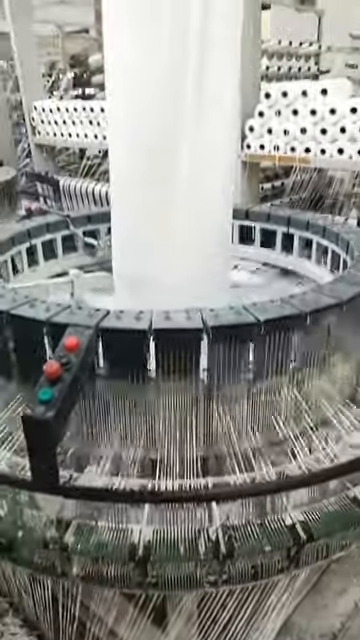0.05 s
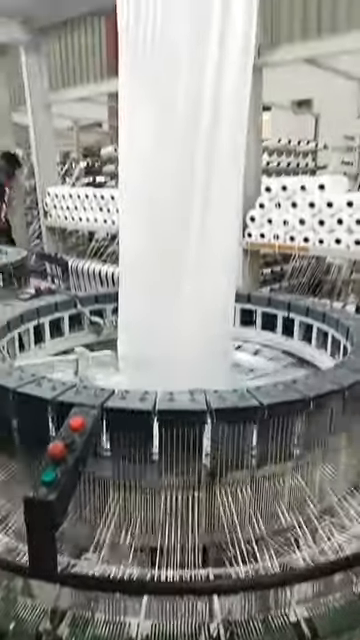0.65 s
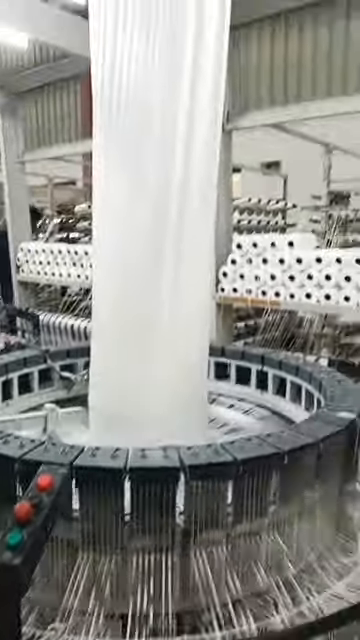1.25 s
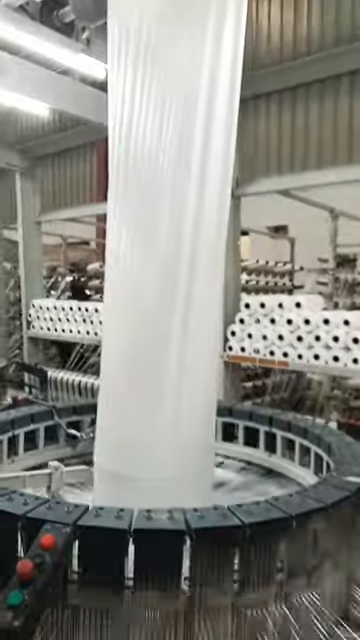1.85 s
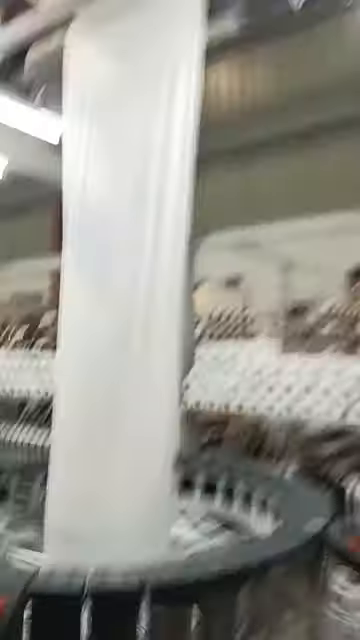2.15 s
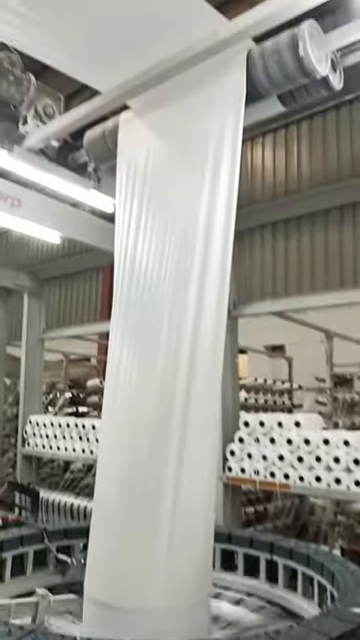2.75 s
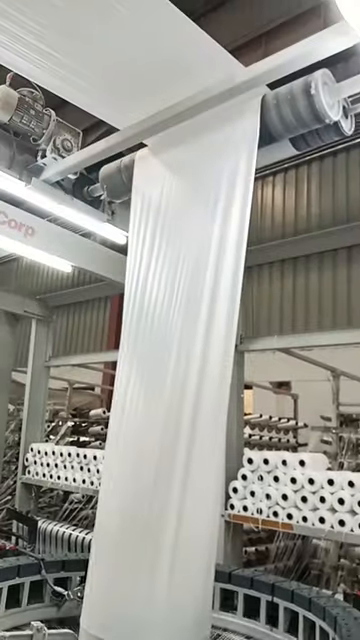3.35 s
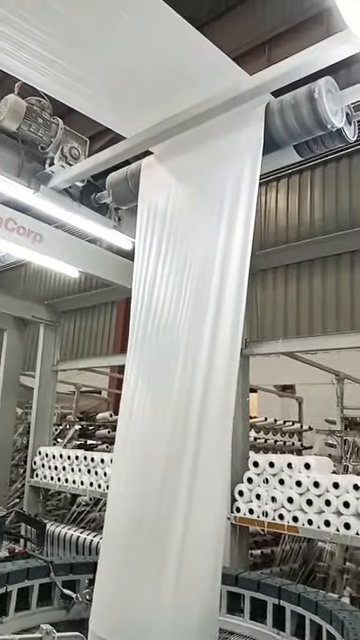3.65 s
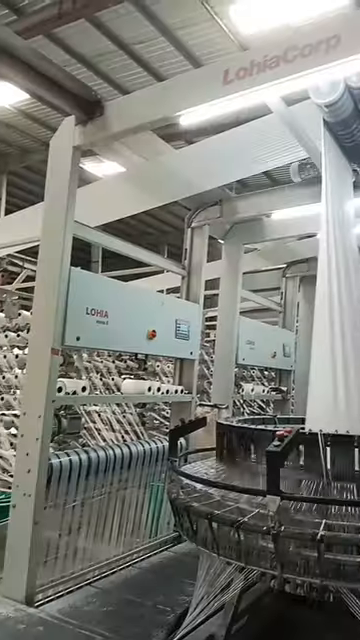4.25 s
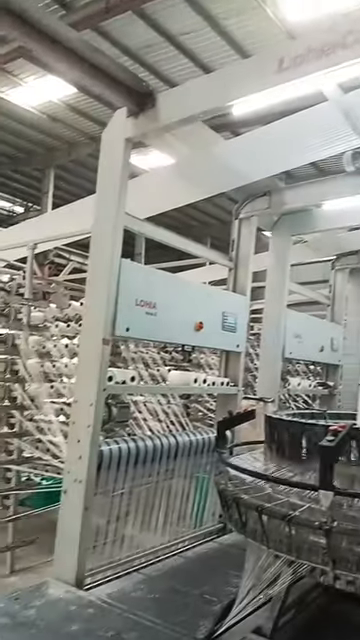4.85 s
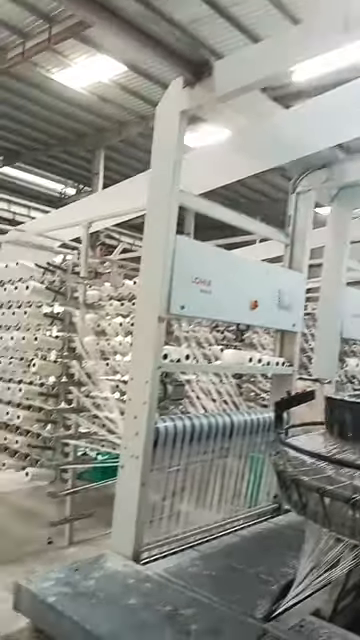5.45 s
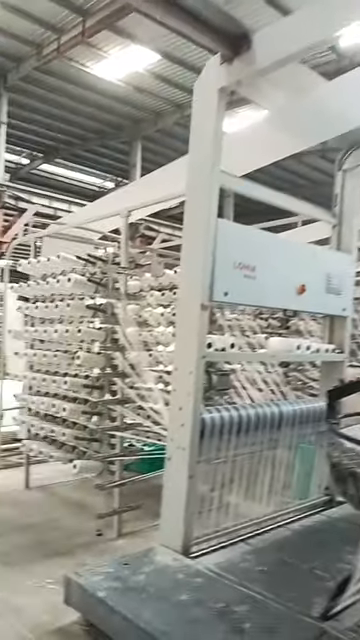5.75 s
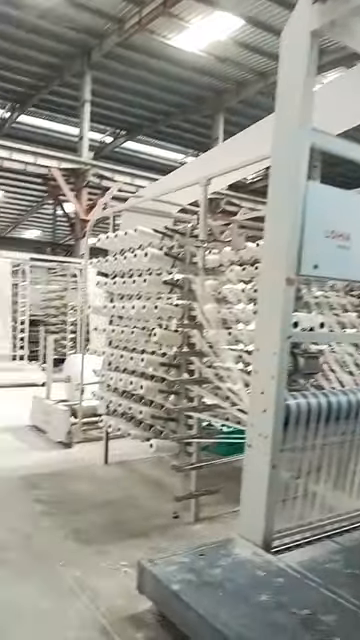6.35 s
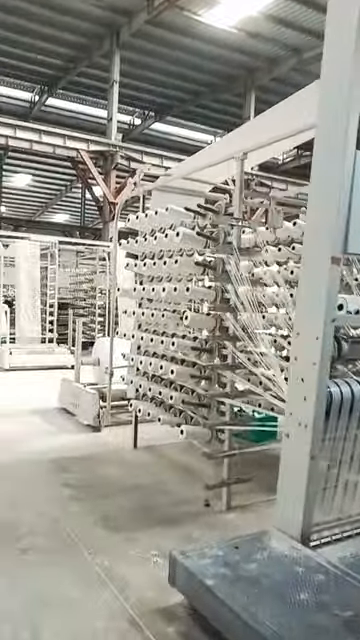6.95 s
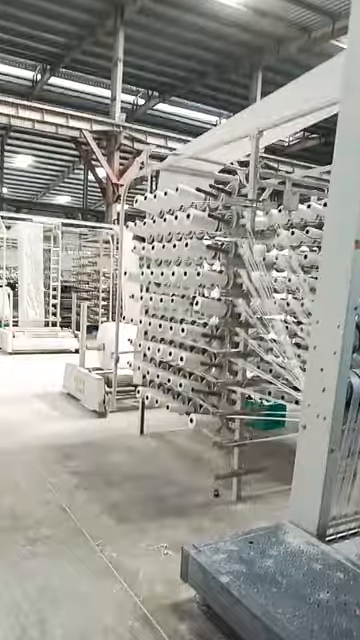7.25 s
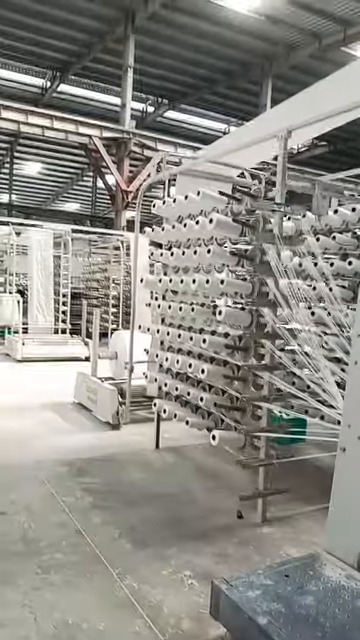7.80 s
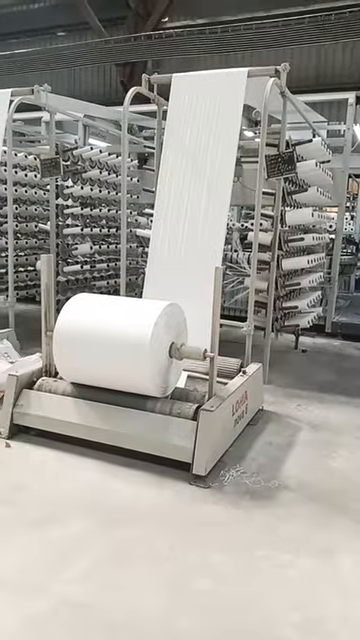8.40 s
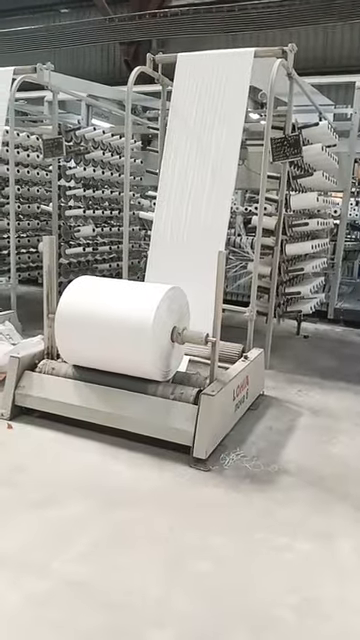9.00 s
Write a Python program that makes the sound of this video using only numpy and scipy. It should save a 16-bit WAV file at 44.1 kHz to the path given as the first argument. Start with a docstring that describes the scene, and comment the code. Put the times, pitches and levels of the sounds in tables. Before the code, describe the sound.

A dense, steady machine roar fills a reverberant weaving hall, blending metallic ringing, fast clatter, tape hiss and humming drives. It is heard from three positions in turn: first beside a loom, quieter and fluttering, with a few faint knocks; then from the aisle, clearly louder and smoother, with one tiny high squeak; and for the last second beside a winder, just as loud and pulsing again.

```python
"""Steel reed rings of circular looms resonate under the hammering of shuttle wheels in a weaving hall.
Heddles clatter, their wires ring, and plastic tapes hiss by friction in their guides, with brief scuffs,
a tick and one stick-slip squeak. A loom frame knocks now and then; drives hum and beat under the roar
of far looms. The hall is heard from three places in turn: at a loom, in the aisle, by a winder."""
import sys
import numpy as np
from scipy import signal
from scipy.fft import rfft, irfft, next_fast_len
from scipy.io import wavfile
from scipy.ndimage import uniform_filter1d

SR = 44100
rng = np.random.default_rng(int(sys.argv[2]) if len(sys.argv) > 2 else 0)


def file_out(sig):
    """Save sig as 16-bit WAV at sys.argv[1]."""
    # one column per channel
    cols = np.atleast_2d(sig).T
    # limit, then scale
    lim = np.clip(cols, -1, 1)
    pcm = np.round(lim * 32767).astype(np.int16)
    wavfile.write(sys.argv[1], SR, pcm)


N = 404397
TIME = np.arange(N) / SR
HZ = np.maximum(np.fft.rfftfreq(next_fast_len(N), 1 / SR), 1)

# friction spectrum of the tapes: (frequency [Hz], relative level at loom [dB], aisle [dB], winder [dB])
TAPE_SPECTRUM = [(1800, -16, -20, -21), (2900, 1, 4, 4), (3620, 0.5, 3.5, 3.5), (4060, 2, 3.5, -1.5),
                 (4500, -0.5, -0.5, 1), (5480, -0.5, 0.5, 0), (6030, -7.5, -5, -5.5), (6750, -0.5, 0.5, -1),
                 (7950, -1.5, -2, -4.5), (8740, -8, -8.5, -12.5), (9320, -19, -19.5, -26),
                 (10100, -15.5, -14.5, -22.5), (11660, -23.5, -26, -29), (13000, -18, -20, -25),
                 (13900, -30, -31, -40), (15400, -55, -25, -35)]
# modes of drives and frames:
# (frequency [Hz], width [Hz], relative level at loom [dB], aisle [dB], winder [dB])
FRAME_MODES = [(81.6, 14, -13, -17, -18), (108.4, 19, -8.5, -23, -13), (171.7, 40, 0, 2, 0),
               (207.4, 26, -2, 0, -1), (275.4, 21, -9, -6, -12), (319.4, 21, -5.5, -5, -6.5),
               (396, 29, -3, -1, -5), (454, 22, -1.5, -2, -11), (550, 110, -6.5, -15, -12),
               (627, 36, -12, -20, -4.5), (900, 27, -16, -9, -20)]


def reed_rings(place, blows, beat):
    """Modal resonance: wheel impacts keep the steel rings sounding, modulated by the shuttle beat."""
    # (frequency [Hz], width [Hz], relative level at loom [dB], aisle [dB], winder [dB])
    ring_modes = [(1073, 83, -15, -11.5, -10.5), (1101.2, 42, -7.5, -3.5, -2.5), (1199.3, 66, -5.5, -1, 0),
                  (1288, 51, -1, -2, 0.5), (1350, 43, -0.5, -1.5, -4), (1369, 40, -2, -2.5, -2),
                  (1463, 117, -11.5, -11, -8), (1544, 66, -11.5, -11.5, -5), (1322, 490, -13.5, -14, -15)]
    surge = from_db(0.72 * drift(per_s=8))  # the wheels bear unevenly on the rings
    ringing = steadied(coloured(blows, resonances(ring_modes, place)), span_s=0.076)
    return rms_one(ringing * (1 + beat) * surge)


def shuttle_beat():
    """Amplitude modulation: the load swings as shuttles and cam lobes come round, never quite in time."""
    # (rate [Hz], relative depth [1])
    cycles = [(13.42, 0.12), (29.05, 0.083), (75.0, 0.072), (2.37, 0.018)]
    return sum(depth * np.sin(2 * np.pi * (hz * TIME + rng.random()) + 0.5 * drift(per_s=0.7))
               for hz, depth in cycles)


def heddle_clatter(place, impacts, beat):
    """Impact noise: dense heddle collisions merge into a band that pulses with the shuttles."""
    # (frequency [Hz], relative level at loom [dB], aisle [dB], winder [dB])
    spectrum = [(1000, -42, -51, -34), (1600, -8, 1, 1), (1780, 0, -4, -2.5), (2050, 3.5, 2, 0),
                (2230, 2.5, 1, 3.5), (2520, 2, -0.5, -1.5), (2660, 1, 2, -2), (2810, -0.5, 0, -10),
                (2830, -12, -12, -10), (3230, -20, -16.5, -17), (5000, -45, -39, -49)]
    return coloured(impacts * (1 + 0.27 * beat), slopes(spectrum, place))


def heddle_wires():
    """Free vibration: plucked steel wires ring in modes that each swell and fade on their own."""
    # (frequency [Hz], width [Hz], relative level [dB])
    wire_modes = [(2690, 160, -4.5), (4040, 220, -12), (5400, 260, -16.5)]
    plucks = contacts(per_s=900, spread_db=3.5)
    ringing = 0
    for hz, width, db in wire_modes:
        mode = coloured(plucks, resonances([(hz, width, 0)]))
        ringing += from_db(db) * rms_one(mode * from_db(1.8 * drift(per_s=8)))
    return ringing


def tape_hiss(place, rubbing, beat):
    """Sliding friction: tiny contacts of tape and guide sum to a hiss that pulses with the shuttles."""
    return coloured(rubbing * (1 + 0.58 * beat), slopes(TAPE_SPECTRUM, place))


def tape_squeak():
    """Stick-slip friction: a tape whistles at each slip, and its guide rings on."""
    # (frequency [Hz], width [Hz], relative level [dB])
    guide_modes = [(4300, 510, 0), (6470, 200, -6), (7200, 160, -6), (7530, 240, -1), (6800, 3000, -15),
                   (8900, 210, -4.5), (12400, 2200, -24), (14520, 250, -25)]
    # (time [s], hold [s], start pitch [Hz], end pitch [Hz], whistle level [dB], guide level [dB])
    slips = [(5.158, 0.007, 6500, 6500, -31, -27), (5.176, 0.019, 7200, 7540, -24.5, -26)]
    attack_s, glide_s = 0.003, 0.006
    ringing = steadied(coloured(rng.standard_normal(N), resonances(guide_modes)), span_s=0.012)
    waver_hz = 40 * drift(per_s=200)
    whistle = guide_gain = 0
    for start, held_s, start_hz, end_hz, whistle_db, guide_db in slips:
        glide = np.exp(-np.maximum(TIME - start, 0) / glide_s)
        pitch_hz = end_hz + (start_hz - end_hz) * glide + waver_hz
        tone = rms_one(np.sin(2 * np.pi * np.cumsum(pitch_hz) / SR))
        whistle += from_db(whistle_db) * envelope(start, attack_s, held_s, t60_s=0.03) * tone
        ring_out = from_db(guide_db) * envelope(start, attack_s, held_s, t60_s=0.29)
        guide_gain = np.maximum(guide_gain, ring_out)
    return whistle + guide_gain * ringing


def tape_scuffs():
    """Friction noise: a narrow band of hiss swells briefly where a tape drags on a guide."""
    # (time [s], half length [s], level [dB], centre frequency [Hz], width [Hz])
    drags = [(1.44, 0.03, -44.5, 7000, 600), (2.87, 0.041, -46, 7400, 600), (5.61, 0.03, -36, 7100, 600),
             (8.998, 0.045, -38, 7000, 2200)]
    rub = rng.standard_normal(N)
    return sum(from_db(db) * bell_curve(time, half_s) * coloured(rub, resonances([(hz, width, 0)]))
               for time, half_s, db, hz, width in drags)


def tape_tick():
    """Transient excitation: a tape snaps off a guide edge with one faint burst of hiss."""
    burst = envelope(start=3.565, attack_s=0.0005, held_s=0.0005, t60_s=0.02)
    return from_db(-35) * burst * coloured(rng.standard_normal(N), slopes(TAPE_SPECTRUM))


def frame_knocks():
    """Damped vibration: the near loom's frame is jolted and rings briefly in its lower modes."""
    # (time [s], level [dB])
    jolts = [(0.5, -41), (0.833, -38), (0.95, -38), (3.5, -40), (3.869, -40)]
    dull_hz = 330
    low_modes = resonances(FRAME_MODES) / (1 + (HZ / dull_hz) ** 2)
    frame = steadied(coloured(rng.standard_normal(N), low_modes), span_s=0.03)
    return frame * sum(from_db(db) * envelope(start, attack_s=0.004, held_s=0.004, t60_s=0.16)
                       for start, db in jolts)


def frame_hum(place, shaking):
    """Forced vibration: drives and frames hum in their modes under steady shaking."""
    return coloured(shaking, resonances(FRAME_MODES, place))


def drive_drone():
    """Beating: drives at nearly equal speeds make a narrow band that swells as they fall into step."""
    # (time [s], half length [s], rise [dB])
    swells = [(4.37, 0.073, 3), (5.77, 0.14, 11), (7.66, 0.18, 6)]
    drone_hz, width_hz = 481.7, 11.3
    swell_db = sum(db * bell_curve(time, half_s) for time, half_s, db in swells)
    band = coloured(rng.standard_normal(N), resonances([(drone_hz, width_hz, 0)]))
    beating = from_db(2.2 * drift(per_s=2))
    return from_db(swell_db) * rms_one(steadied(band, span_s=0.19) * beating)


def hall_roar():
    """Incoherent summation: all the far looms merge into one steady broadband noise."""
    # (frequency [Hz], relative level [dB])
    spectrum = [(20, -14), (45, -28), (65, -25), (85, -16), (115, -5.5), (160, -4.5), (240, 0), (400, 0),
                (540, 1), (710, -2), (900, -0.5), (1400, 1.5), (1900, -0.5), (3000, -45)]
    return coloured(rng.standard_normal(N), slopes(spectrum))


def in_hall(direct, wet):
    """Diffuse reverberation: the hall smears the share `wet` of the impacts' power into smooth noise."""
    return np.sqrt(1 - wet) * direct + np.sqrt(wet) * rng.standard_normal(N)


def contacts(per_s, spread_db):
    """Shot noise: random small impacts of uneven strength; rms 1."""
    impulses = (rng.random(N) < per_s / SR) * rng.choice([-1, 1], N)
    return rms_one(impulses * from_db(spread_db * rng.standard_normal(N)))


def drift(per_s):
    """Low-pass noise: a random wander with about this many turns a second; rms 1."""
    return coloured(rng.standard_normal(N), 1 / (1 + (HZ / per_s) ** 2))


def steadied(x, span_s):
    """Division by the running rms evens out swells, as in a machine at constant speed."""
    return x / np.sqrt(uniform_filter1d(x ** 2, int(span_s * SR)) + 1e-9)


def envelope(start, attack_s, held_s, t60_s):
    """A linear rise, then exponential decay from held_s after the start."""
    age = TIME - start
    return np.clip(age / attack_s, 0, 1) * from_db(-60 * np.maximum(age - held_s, 0) / t60_s)


def bell_curve(time, half_s):
    """A Gaussian swell that falls to 1/e at half_s either side of its peak."""
    return np.exp(-((TIME - time) / half_s) ** 2)


def coloured(x, gain):
    """Linear filtering by a gain given at each frequency of HZ; rms 1."""
    size = next_fast_len(N)
    return rms_one(irfft(rfft(x, size) * gain, size)[:N])


def resonances(modes, column=0):
    """Gain of steep-sided resonances that add in power."""
    return np.sqrt(sum(from_db(levels[column]) ** 2 / (1 + (2 * (HZ - hz) / width) ** 2) ** 2
                       for hz, width, *levels in modes))


def slopes(points, column=0):
    """Gain through the points of a spectrum, straight in decibels over log frequency."""
    hz, *levels = np.transpose(points)
    return from_db(np.interp(np.log(HZ), np.log(hz), levels[column]))


def from_db(db):
    """Decibels to amplitude ratio."""
    return 10 ** (np.asarray(db) / 20)


def rms_one(x):
    """Scale to unit rms."""
    return x / np.sqrt(np.mean(x ** 2) + 1e-20)


def scene():
    """Superposition: the same machines at constant speed, weighted differently at each place."""
    # one row each for loom, aisle and winder:
    # (nearness to a loom [0-1], ring [dB], clatter [dB], hiss [dB], roar [dB], hum [dB], drone [dB])
    balances = [(0.81, -26, -37, -38.5, -40.5, -43, -47), (0.26, -15.5, -25.7, -29.5, -26, -34, -37.5),
                (0.68, -15.3, -25.6, -31.5, -27.5, -33.5, -42)]
    # stay at each place: (start [s], end [s])
    stays = [(-0.02, 4.136), (4.163, 8.062), (8.087, 9.2)]
    # level slopes as the listener moves during a stay: (ring [dB/s], clatter [dB/s], hiss [dB/s])
    approach = [(-0.08, 0.25, 0.44), (0.25, -0.14, 0.08), (0, 0.5, 0.2)]
    beat, tension = shuttle_beat(), drift(per_s=11)
    drone, wires = drive_drone(), heddle_wires()
    blows = in_hall(contacts(per_s=1400, spread_db=2.0), wet=0.77)
    impacts = in_hall(contacts(per_s=1100, spread_db=4.5), wet=0.79)
    impacts *= from_db(0.25 * tension + 0.53 * drift(per_s=7))
    rubbing = in_hall(contacts(per_s=3000, spread_db=2.5), wet=0.8)
    roar, shaking = hall_roar(), rng.standard_normal(N)
    mix = tape_squeak() + tape_scuffs() + frame_knocks() + tape_tick()
    for place, (nearness, ring_db, clatter_db, hiss_db, roar_db, hum_db, drone_db) in enumerate(balances):
        start, end = stays[place]
        ring_rise_db, clatter_rise_db, hiss_rise_db = np.outer(approach[place], TIME - (start + end) / 2)
        near_beat = nearness * beat
        ring = from_db(ring_db + ring_rise_db) * reed_rings(place, blows, near_beat)
        clatter = from_db(clatter_db + clatter_rise_db) * heddle_clatter(place, impacts, near_beat)
        hiss_gain = from_db(hiss_db + hiss_rise_db + 0.75 * nearness * tension)
        hiss = hiss_gain * (tape_hiss(place, rubbing, near_beat) + nearness * wires)
        hum = from_db(hum_db) * frame_hum(place, shaking) + from_db(drone_db) * drone
        # each place comes in at once and leaves with a short fade
        gate = np.clip((TIME - start) / 0.001, 0, 1) * np.clip((end - TIME) / 0.014, 0, 1)
        mix += gate * (ring + clatter + hiss + hum + from_db(roar_db) * roar)
    return mix[None]


def record(dry):
    """Band limiting: the microphone sheds the deepest bass, and the top treble is cut steeply."""
    low_cut_hz, high_cut_hz = 88, 15450
    thinned = signal.sosfilt(signal.butter(2, low_cut_hz, "high", fs=SR, output="sos"), dry)
    return signal.sosfilt(signal.ellip(12, 0.1, 80, high_cut_hz, fs=SR, output="sos"), thinned)


dry = scene()
out = record(dry)
file_out(out)
```